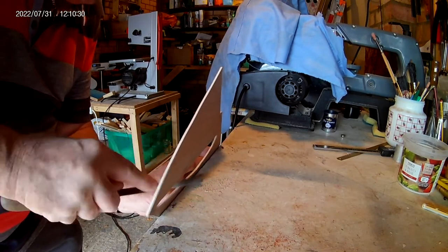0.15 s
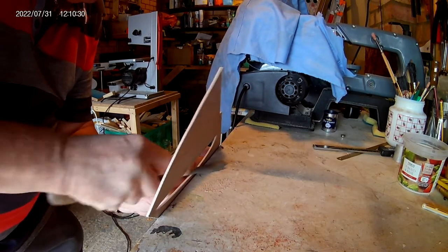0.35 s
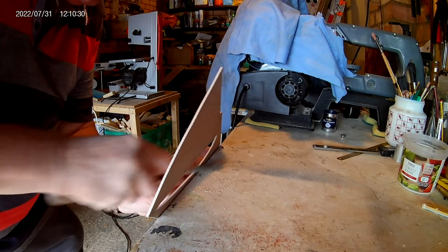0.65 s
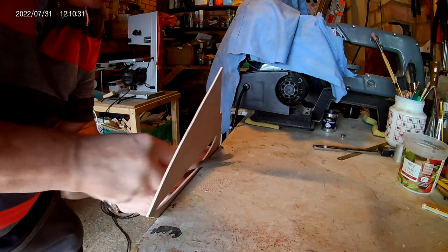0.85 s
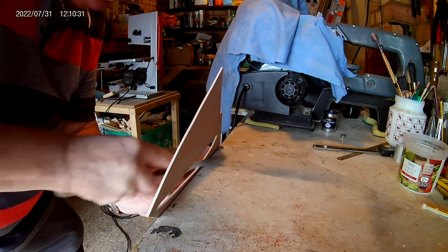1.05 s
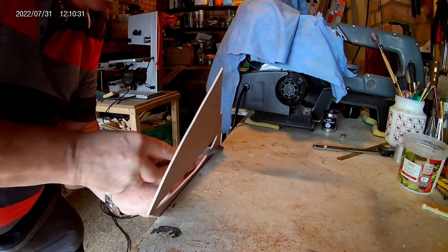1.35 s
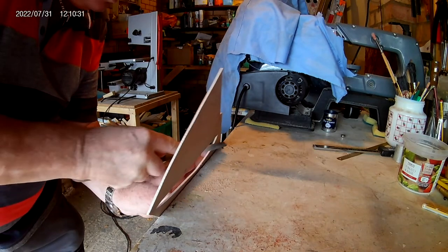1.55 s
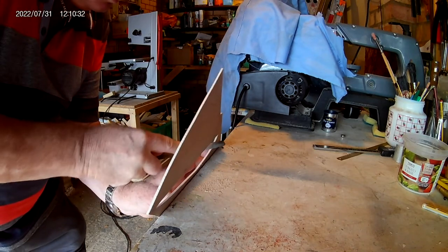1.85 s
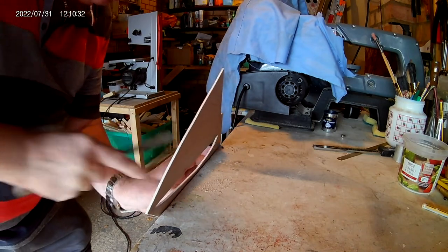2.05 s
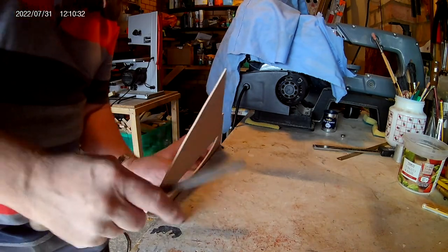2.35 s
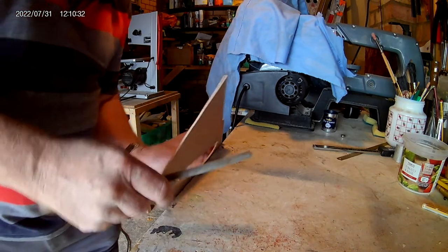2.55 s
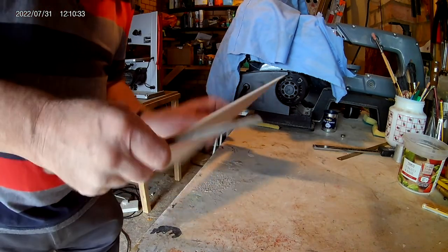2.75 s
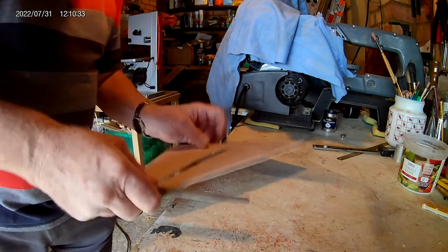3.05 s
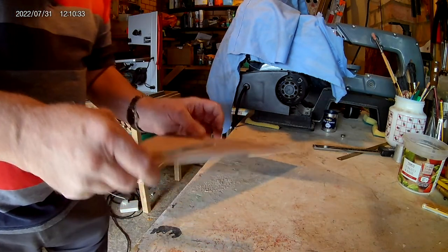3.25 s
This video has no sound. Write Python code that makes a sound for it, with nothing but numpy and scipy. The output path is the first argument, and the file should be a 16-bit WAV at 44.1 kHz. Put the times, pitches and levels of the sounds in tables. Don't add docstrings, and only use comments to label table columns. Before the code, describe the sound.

A hand file rasps a thin wooden panel, close-miked in a small, dry workshop with low rumble. Strong, hollow, buzzing strokes run from 0 to 1.25 s, biting hardest near 0.25 and 0.6, with a brief gap around 0.77. Lighter brushes fade by 1.95, with a faint rattle at 1.65. Fingers rub and scuff at 2.3-2.8; sharp bouncing wooden taps land at 2.84 and 3.01, then near quiet.

```python
import sys
import numpy as np
from scipy import signal
from scipy.fft import rfft, irfft
from scipy.io import wavfile
from scipy.ndimage import uniform_filter1d

SR = 44100
rng = np.random.default_rng(int(sys.argv[2]) if len(sys.argv) > 2 else 0)


def field_ratio(decibels):
    return 10 ** (np.asarray(decibels, dtype=float) / 20)


def dump_mix(stems):
    frames = np.atleast_2d(stems).T
    limited = np.clip(frames, -1, 1)
    pcm = np.round(limited * 32767).astype(np.int16)
    wavfile.write(sys.argv[1], SR, pcm)


N = 149940

# frequency_hz, density_db
RUMBLE = [(20, -4), (60, 1.5), (200, -7), (500, -19), (1500, -33.5), (5300, -50.5), (6500, -51.5),
          (15500, -56.5)]
RUMBLE_DB = -51
# frequency_hz, t60_s
ROOM_DECAY = [(200, 0.31), (1000, 0.14), (4000, 0.065), (12000, 0.018)]
ROOM_DB = -13
# frequency_hz, share_kept
TREBLE_KEPT = [(2000, 1), (5000, .7), (6000, .35), (7500, .16), (15000, .1)]
DROPPED_DB = -22

# time_s, level_db
HANDLING = [(1.9, -91), (2.05, -74), (2.18, -80.5), (2.27, -73.5), (2.34, -77.5), (2.53, -74), (2.66, -77),
            (2.9, -67), (3.1, -104), (3.16, -78.5), (3.4, -98)]
# frequency_hz, density_db
RUB = [(300, 7), (800, 3), (2000, -6.5), (3500, -19.5), (5300, -16.5), (6500, -39), (10000, -39.5),
       (15500, -54)]
RUB_DB = 10
SWISH_HZ, SWISH_WIDTH_HZ, SWISH_DB = 5400, 1100, 5

# start_s,
# length_s, level_db, treble_db, squeak_hz
SCUFFS = [(1.141, 0.023, -48, 3.5, 3700), (1.839, 0.035, -60.5, 2, 1700), (2.327, 0.02, -41, -11, 1560),
          (2.366, 0.038, -54, 6.5, 2960), (2.418, .01, -51, -11, 1400), (2.44, 0.02, -51, 2.5, 1460),
          (2.478, 0.024, -51, -1, 1320), (2.512, 0.039, -62, 9.5, 5670), (2.549, 0.02, -53, 0, 1550),
          (2.586, .025, -59.5, 6, 5600), (2.772, 0.035, -49.5, 1, 1130), (2.82, 0.021, -48.5, 1, 1080),
          (3.246, 0.014, -58, 2.5, 4000)]
SCUFF_RISE = 0.37
SQUEAK_DB, SQUEAK_SHARE = 3, 0.08

# start_s, peak_db
TICKS = [
    (1.6302, -55),
    (1.6665, -45.5),
    (1.711, -57),
    (2.4977, -48),
    (2.6311, -50),
]
# frequency_hz, level_db, t60_s
RATTLE_MODES = [(1233, -3, 0.023), (1717, -2.5, 0.026), (2234, -2, 0.024), (3112, -21, 0.015),
                (4090, -20, 0.022)]

# start_s, peak_db, centre_hz
SNAPS = [(1.15, -54, 5150), (1.667, -63.5, 2940), (2.329, -55, 1520), (2.378, -57, 2880),
         (2.498, -55.5, 2260), (2.522, -64, 8400), (2.634, -61.5, 2270), (2.842, -40, 2200),
         (2.86, -39.5, 2280), (2.874, -45, 3500), (2.883, -44, 1300), (3.012, -46, 1900),
         (3.035, -53.5, 2400), (3.249, -67.5, 3950)]
SNAP_T60_S, SNAP_SHARE = 0.035, 0.7
CONTACT_S = 0.0007

# start_s, peak_db, treble_db above peak
TAPS = [
    (2.842, -38.5, 8),
    (2.848, -37, -18),
    (2.860, -47, 6),
    (2.873, -41.5, -0.5),
    (3.012, -41, 1.5),
    (3.018, -41.5, -10),
    (3.034, -64, 4),
    (3.05, -56.5, -9),
]
# frequency_hz, level_db, t60_s
TAP_MODES = [(171, -0.5, 0.089), (307, -5.5, 0.12), (622, -1.5, 0.073), (740, -5.5, .1), (940, -21, 0.11),
             (1104, -13, 0.18), (1394, -3.5, 0.043), (1712, -3, 0.046), (2347, -7.5, 0.039),
             (2650, -22, 0.042), (3000, -22, 0.041), (3700, -22, 0.057), (5450, -26, 0.055)]
CRACK_T60_S, CRACK_DB = 0.045, 0
SPLIT_HZ = 2000
HUM_HZ, HUM_WIDTH_HZ, HUM_DB, HUM_T60_S = 1170, 450, -11, 0.3

# start_s,
# peak_db, pitch_hz
KNOCKS = [
    (-.002, -29.5, 414),
    (2.845, -30, 588),
    (2.842, -28.5, 166),
    (2.868, -37, 293),
    (2.876, -37, 610),
    (3.015, -31, 628),
    (3.028, -46, 597),
]
# start_s, peak_db, pitch_hz
BITES = [(0.048, -25, 642), (0.121, -32, 660), (0.141, -27, 666), (0.171, -26, 643), (0.233, -25.5, 510),
         (0.244, -17, 647), (0.306, -28, 398), (0.36, -25.5, 630.5), (0.381, -32, 660), (0.441, -30, 670),
         (0.501, -39, 680), (0.536, -23, 622), (0.552, -23.5, 625), (0.587, -22, 529.6),
         (0.607, -24.5, 514), (0.629, -37, 666.7), (0.798, -26.5, 361.7), (0.82, -24, 407.8),
         (0.831, -24.5, 445), (0.844, -29, 513.8), (0.864, -27.5, 484), (0.877, -25, 438.5),
         (0.899, -25, 433), (0.95, -28.5, 660), (0.966, -30.5, 640), (1.029, -32.5, 1214),
         (1.15, -25.5, 755.7), (1.162, -27, 754), (1.198, -27.5, 688.7), (1.354, -35, 705),
         (1.509, -44, 625), (1.533, -34, 740), (1.552, -37, 775), (1.608, -37, 630), (1.691, -44, 697),
         (1.82, -43.5, 482), (1.847, -40, 373), (1.879, -46.5, 695), (2.327, -41, 525), (2.332, -42, 358),
         (2.477, -41, 567), (2.55, -43, 364), (3.245, -54, 1076)]
BITE_DB, BITE_S = -5.5, 0.0032
OVERTONE_RATIO, OVERTONE_DB = 1.9, -17

# time_s, pressure_db, grit_db above pressure, tooth_rate_hz
EARLY_STROKES = [
    [(0.0, -36.5, -15, 599), (0.024, -47.5, 1, 639), (0.032, -42.5, -11, 618), (0.054, -37, -11.5, 672.6),
     (0.072, -47, -11, 658), (0.1, -66.5, 2, 631)],
    [(0.1, -53.5, -11, 663.5), (0.148, -40, -7.5, 667.5), (0.222, -42.5, -5.5, 574.9),
     (0.238, -26.5, -23.5, 591), (0.266, -35, -28.5, 568.4), (0.292, -56, -7.5, 547.5)],
    [(0.292, -61, -12, 443.8), (0.308, -32.5, -23, 459.5), (0.36, -33.5, -15, 637.5),
     (0.44, -48.5, -3.5, 655.7), (0.448, -37.5, -17.5, 672), (0.475, -69, -2, 555)],
    [(0.475, -52.5, -7, 650.2), (0.533, -36, -10.5, 631.2), (0.587, -26, -18, 544.1),
     (0.635, -35, -11, 587), (0.765, -81.5, -3, 403.7), (0.77, -87, -45, 408)],
]
LATE_STROKES = [
    [(0.775, -53.5, -18.5, 390.8), (0.805, -30.5, -22.5, 416), (0.867, -28.5, -19.5, 476),
     (0.905, -33.5, -19, 464), (0.94, -66, -19.5, 486.3)],
    [(0.94, -62.5, 3, 676), (0.952, -35.5, -21.5, 656.8), (1.048, -48.5, -3, 667),
     (1.092, -61.5, -2.5, 723.3), (1.138, -69, -12.5, 453)],
    [(1.14, -70, -19, 718.4), (1.15, -35.5, -19, 733), (1.208, -36.5, -18.5, 703), (1.254, -57, -10, 690.2),
     (1.285, -70, -24, 553)],
]
LIGHT_STROKES = [
    [(1.285, -58.5, -9, 509.6), (1.387, -48, -10.5, 691), (1.46, -73, -24.5, 386.7)],
    [(1.47, -62.5, -14.5, 529), (1.542, -39.5, -14.5, 712), (1.59, -66, -6.5, 714)],
    [(1.59, -48.5, -24.5, 584), (1.632, -44.5, -18, 489.3), (1.77, -69, -19, 405.3)],
    [(1.78, -63, -31, 433.6), (1.83, -51, -16, 473.3), (1.95, -84, -0.5, 400)],
]
# frequency_hz, width_hz, level_db
PANEL_MODES = [(360, 26.7, -6), (424, 46.6, -6), (507.7, 31.4, -4.5), (631, 24, -1), (724, 52, -4),
               (775, 41.4, -3), (1080, 52, -8), (1309, 48, -12), (1256, 66, -12), (1427, 56, -7.5),
               (1633, 110, -19.5), (1812, 61, -12.5), (946, 25, -20), (3038, 130, -19.5)]
# frequency_hz, width_hz, level_db
STEEL_MODES = [(2200, 170, 9), (2850, 200, 0), (3090, 220, 3), (3950, 400, -4), (5030, 300, -5),
               (5430, 420, -1), (5870, 300, -5), (6800, 400, -15), (8800, 300, -24), (9800, 650, -21),
               (10550, 380, -19)]
# frequency_hz, density_db
GRIT = [(150, -17), (800, -6), (2300, -20), (3300, -29), (4500, -38), (5500, -35.5), (7500, -50),
        (15500, -59)]
# time_s, steel_db
ANGLE = [
    (0, -0.5),
    (.2, 2.5),
    (.4, -2.5),
    (.6, 0),
    (.85, -4),
    (1.0, 3.5),
    (1.15, -0.5),
    (1.5, -6),
    (1.9, 2.5),
]
TEETH_DB, GRIT_DB, STEEL_DB, BROAD_DB = -1, 11, -18, -7
TOOTH_JITTER, TOOTH_WIDTH_HZ = 0.15, 200
CHATTER_DB, CHATTER_S = 2.0, 0.008
GRAINS_PER_S, GRAIN_SPREAD_DB = 14000, 1.2
WANDER_DB, WANDER_S = 3, 0.1
PATCH_DB, PATCH_FRAMES, PATCH_BINS = 4.0, 16, 3


def evened(x):
    return x / np.sqrt(np.mean(x ** 2) + 1e-20)


def coloured(x, points):
    hz = np.fft.rfftfreq(len(x), 1 / SR)
    f, db = np.transpose(points)
    gain = field_ratio(np.interp(np.log(hz + 1), np.log(f + 1), db))
    return evened(irfft(rfft(x) * gain, len(x)))


def tilted(x, treble_db):
    dull = signal.lfilter(*signal.butter(2, SPLIT_HZ, fs=SR), x)
    return dull + field_ratio(treble_db) * (x - dull)


def resonate(x, hz, width):
    turn = np.exp(2j * np.pi * np.cumsum(hz * np.ones(len(x))) / SR)
    r = np.exp(-np.pi * width / SR)
    return 2 * (turn * signal.lfilter([1 - r], [1, -r], x / turn)).real


def resonate_twice(x, hz, width):
    return resonate(resonate(x, hz, width), hz, width)


def body(x, modes):
    return sum((-1) ** k * field_ratio(db) * resonate(x, hz, w) for k, (hz, w, db) in enumerate(modes))


def ring(modes, t, mix):
    return sum(m * field_ratio(db - 60 * t / t60) * np.sin(2 * np.pi * hz * t)
               for m, (hz, db, t60) in zip(mix, modes))


def grains(per_s, spread_db):
    size = field_ratio(spread_db * np.minimum(rng.exponential(1, N), 5))
    return rng.standard_normal(N) * size * (rng.random(N) < per_s / SR)


def patchy(x):
    z = signal.stft(x, nperseg=256, noverlap=192)[2]
    drift = uniform_filter1d(rng.standard_normal(z.shape[::-1]), 2 * PATCH_FRAMES, axis=0)
    drift = evened(uniform_filter1d(drift, PATCH_BINS, axis=1)).T
    return signal.istft(z * field_ratio(PATCH_DB * drift), nperseg=256, noverlap=192)[1][:N]


def placed(events):
    out = np.zeros(N + 2 * SR)
    for s, sound in events:
        out[SR + round(s * SR):][:len(sound)] += sound
    return out[SR:SR + N]


def rumble():
    return field_ratio(RUMBLE_DB) * coloured(rng.standard_normal(N), RUMBLE)


def room(x):
    hz, t, z = signal.stft(rng.standard_normal(SR // 2), SR, nperseg=256)
    f, t60 = np.transpose(ROOM_DECAY)
    t60 = np.interp(np.log(hz + 1), np.log(f), t60)[:, None]
    tail = signal.istft(z * field_ratio(-60 * t / t60), SR, nperseg=256)[1]
    tail = np.concatenate([np.zeros(150), tail])
    return signal.fftconvolve(x, tail / np.linalg.norm(tail))[:N]


def handling():
    s, db = np.transpose(HANDLING)
    rub = patchy(coloured(grains(9000, 1.9), RUB))
    swish = field_ratio(SWISH_DB) * resonate_twice(rub, SWISH_HZ, SWISH_WIDTH_HZ)
    return (rub + swish) * field_ratio(np.interp(np.arange(N) / SR, s, db, left=-110) + RUB_DB)


def scuffs():
    t, events = np.arange(SR // 4) / SR, []
    for s, length, db, treble_db, hz in SCUFFS:
        rub = tilted(coloured(rng.standard_normal(len(t)), RUB), treble_db)
        squeak = field_ratio(SQUEAK_DB) * resonate(rub, hz, SQUEAK_SHARE * hz)
        u = t / (length * SCUFF_RISE)
        events.append((s, field_ratio(db + 6.0) * u * np.exp(-u) * (rub + squeak)))
    return placed(events)


def rattles():
    t, events = np.arange(SR // 4) / SR, []
    for s, db in TICKS:
        mix = rng.uniform(0.54, 1, len(RATTLE_MODES))
        events.append((s, field_ratio(db + 3.0) * ring(RATTLE_MODES, t, mix) * np.minimum(t / 0.0024, 1)))
    return placed(events)


def snaps():
    t, events = np.arange(SR // 20) / SR, []
    for s, db, hz in SNAPS:
        burst = evened(resonate_twice(rng.standard_normal(len(t)), hz, SNAP_SHARE * hz))
        events.append((s, burst * field_ratio(db - 60 * t / SNAP_T60_S) * np.minimum(t / CONTACT_S, 1)))
    return placed(events)


def taps():
    t, events = np.arange(SR // 4) / SR, []
    attack = np.sin(np.minimum(t / CONTACT_S, 1) * np.pi / 2) ** 2
    for s, db, treble_db in TAPS:
        mix = rng.uniform(0.6, 1, len(TAP_MODES)) * rng.choice([-1, 1], len(TAP_MODES))
        crack = coloured(rng.standard_normal(len(t)), RUB) * field_ratio(CRACK_DB - 60 * t / CRACK_T60_S)
        hum = evened(resonate_twice(rng.standard_normal(len(t)), HUM_HZ, HUM_WIDTH_HZ))
        hum = hum * field_ratio(HUM_DB - 60 * t / HUM_T60_S)
        blow = tilted(ring(TAP_MODES, t, mix) + crack, treble_db + 2.5)
        events.append((s, field_ratio(db) * (blow + hum) * attack))
    return placed(events)


def bites_and_knocks():
    t, events = np.arange(SR // 20) / SR, []
    u = t / BITE_S
    for s, db, hz in BITES + KNOCKS:
        overtone = field_ratio(OVERTONE_DB) * np.sin(2 * np.pi * OVERTONE_RATIO * hz * t)
        tone = np.sin(2 * np.pi * hz * t) + overtone
        events.append((s, field_ratio(db + BITE_DB) * u * np.exp(1 - u) * tone))
    return placed(events)


def steel(x):
    t, knots = np.arange(N) / SR, np.arange(0, N / SR + WANDER_S, WANDER_S)
    wander = rng.standard_normal((len(STEEL_MODES), len(knots)))
    out = np.zeros(N)
    for k, (hz, width, db) in enumerate(STEEL_MODES):
        gain = field_ratio(db + WANDER_DB * np.interp(t, knots, wander[k]))
        out += (-1) ** k * gain * resonate_twice(x, hz, width)
    return out


def rasp():
    t = np.arange(N) / SR
    s, press_db, grit_db, tooth_hz = np.vstack(EARLY_STROKES + LATE_STROKES + LIGHT_STROKES).T
    press = np.interp(t, s, press_db, right=-100)
    chatter = CHATTER_DB * evened(uniform_filter1d(rng.standard_normal(N), int(CHATTER_S * SR)))

    hz = np.interp(t, s, tooth_hz)
    jitter = TOOTH_JITTER * evened(uniform_filter1d(rng.standard_normal(N), size=80))
    passed = np.cumsum(hz * (1 + jitter)) / SR
    strikes = np.diff(np.floor(passed), prepend=0) - hz / SR
    teeth = evened(resonate(strikes, hz, TOOTH_WIDTH_HZ)) * field_ratio(press + chatter + TEETH_DB)

    fibres = evened(grains(GRAINS_PER_S, GRAIN_SPREAD_DB))
    scale = np.std(body(fibres, PANEL_MODES))
    fibres = fibres * field_ratio(press + chatter / 4 + np.interp(t, s, grit_db) + GRIT_DB)
    level = np.std(fibres)

    panel = body(teeth, PANEL_MODES) + body(fibres, PANEL_MODES) / scale * field_ratio(-2.5)
    tearing = field_ratio(BROAD_DB) * level * patchy(coloured(fibres, GRIT))
    steel_gain = field_ratio(STEEL_DB + np.interp(t, *np.transpose(ANGLE)))
    return panel + tearing + steel_gain * level * evened(steel(fibres))


def scene():
    near = handling() + scuffs() + rattles() + snaps() + taps() + bites_and_knocks() + rasp()
    return (rumble() + field_ratio(ROOM_DB) * room(near) + near)[None]


def thinned(x):
    hz, _, z = signal.stft(x, SR, "cosine", nperseg=2048, noverlap=1024)
    power = abs(z) ** 2
    threshold = -np.log(np.interp(hz, *np.transpose(TREBLE_KEPT)))[:, None]
    weak = power < threshold * uniform_filter1d(power, size=32, axis=1)
    z = z * np.where(weak, field_ratio(DROPPED_DB), 1)
    return signal.istft(z, SR, "cosine", nperseg=2048, noverlap=1024)[1][:, :N]


def low_pass(x):
    return signal.sosfilt(signal.butter(12, 15720, fs=SR, output="sos"), x)


def record(dry):
    mix = thinned(dry)
    return low_pass(mix)


dry = scene()
out = record(dry)
dump_mix(out)
```